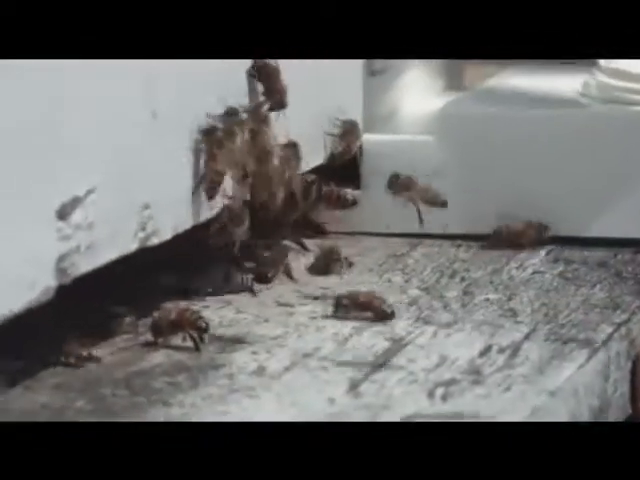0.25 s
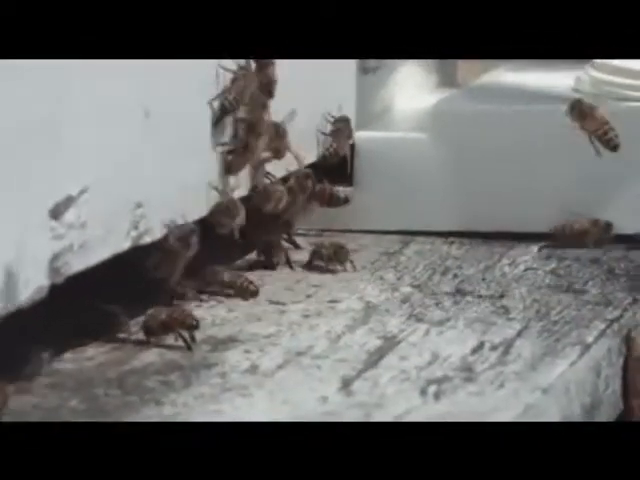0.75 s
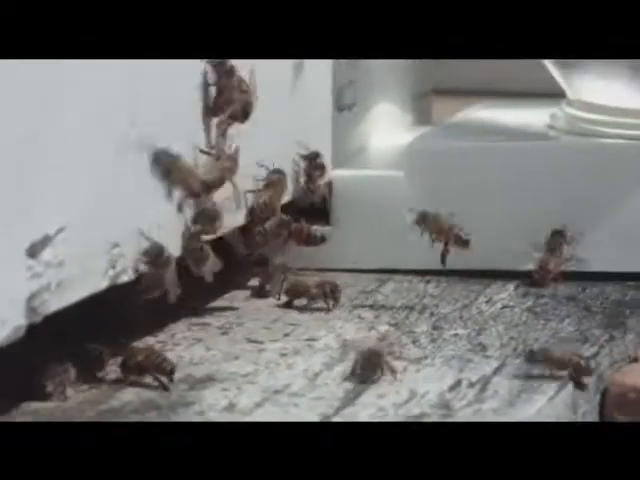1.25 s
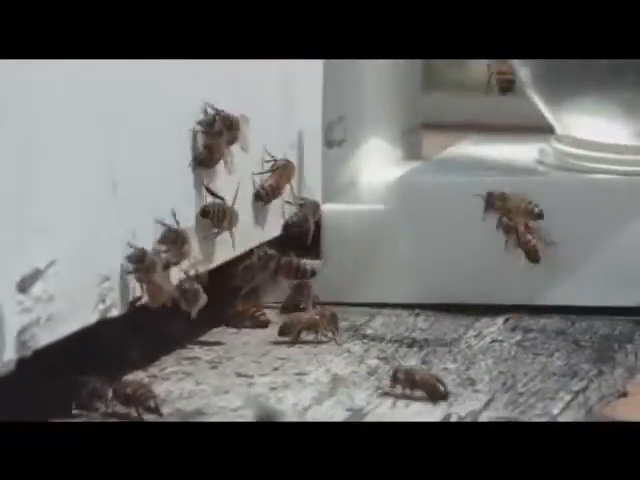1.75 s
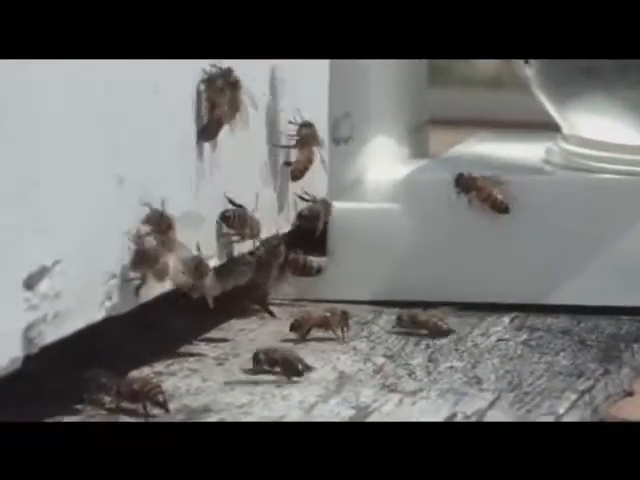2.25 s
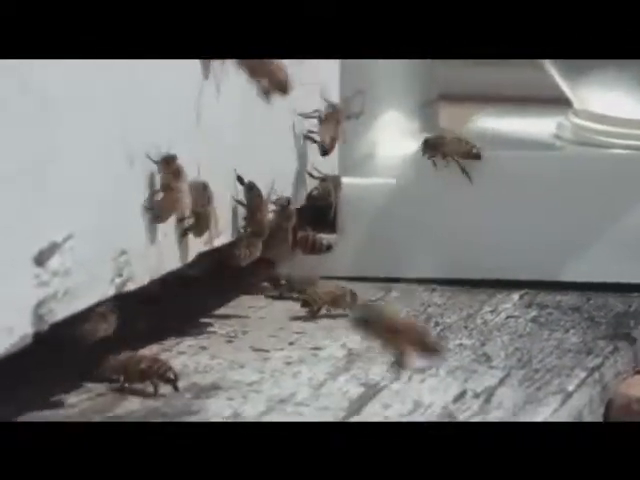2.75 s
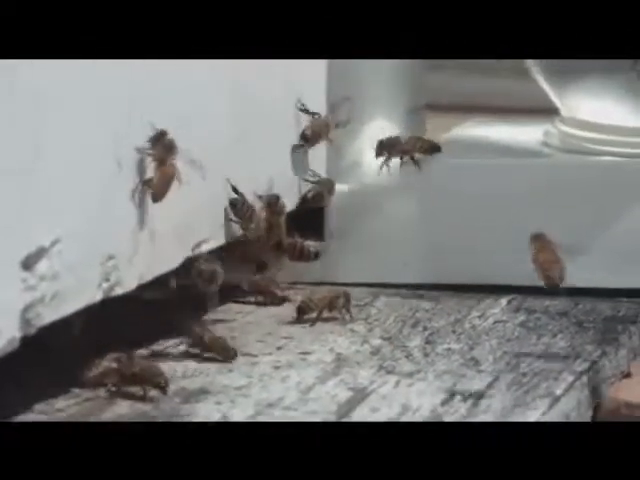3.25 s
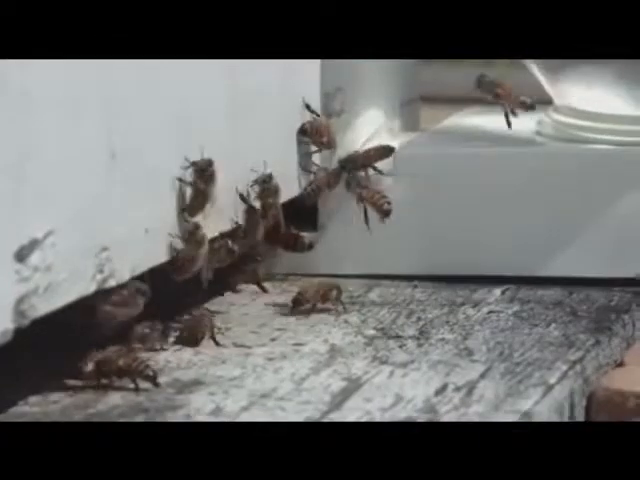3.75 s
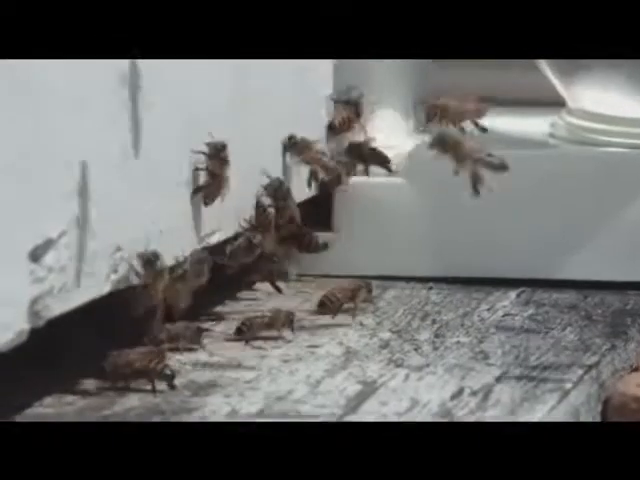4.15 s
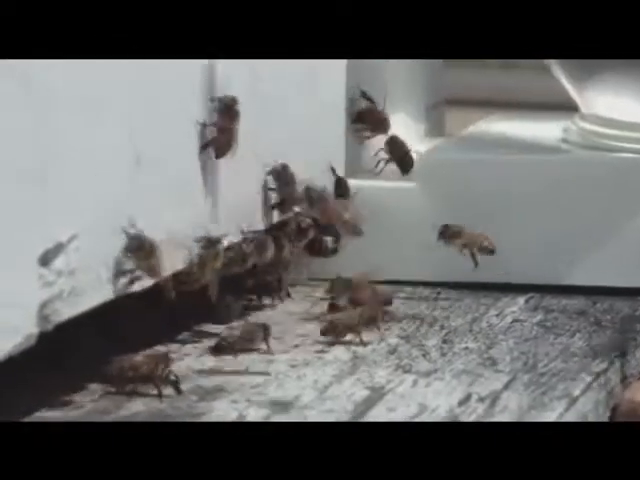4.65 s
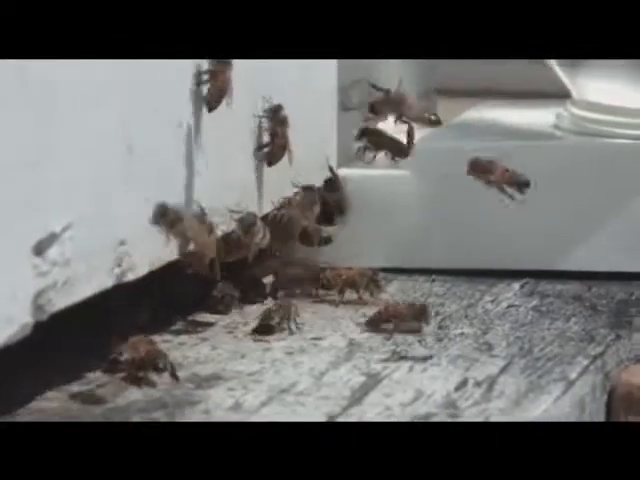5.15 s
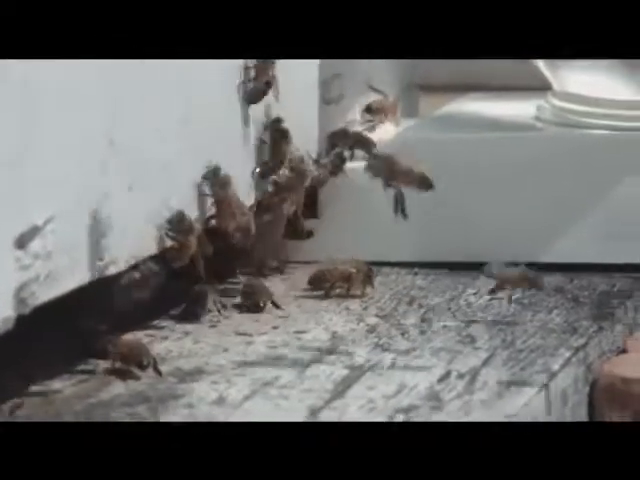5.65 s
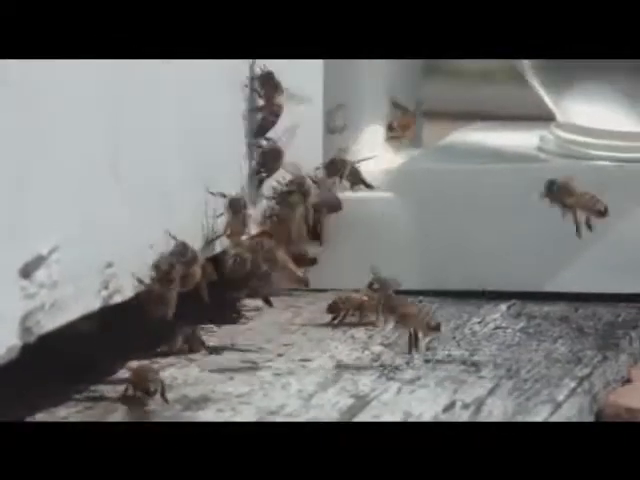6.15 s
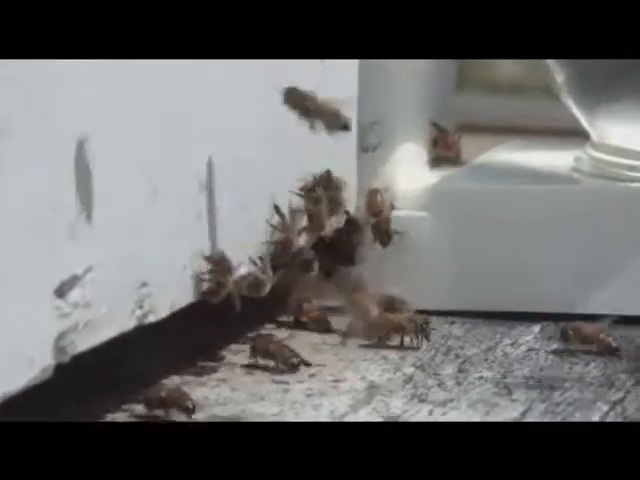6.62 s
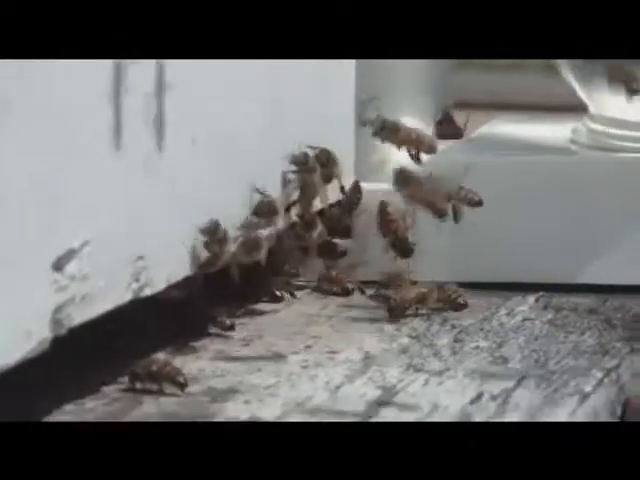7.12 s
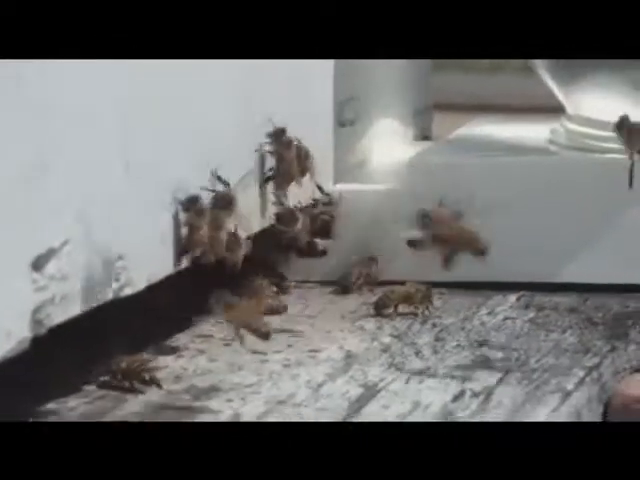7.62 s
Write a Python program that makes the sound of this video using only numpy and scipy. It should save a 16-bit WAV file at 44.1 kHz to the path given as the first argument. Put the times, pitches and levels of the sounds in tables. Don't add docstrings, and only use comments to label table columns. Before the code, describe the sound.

A windy outdoor hive entrance, heard through a small camera microphone. Deep gusts rumble and flutter throughout, with stronger slaps near 2.4, 3.1, 4.0, 6.7 and 7.5 seconds. Leaf rustle and preamp hiss make a continuous airy bed; its level steps up at 2.4, dips slightly at 4.4, leaps at 6.15, then drops at 6.7 and 7.25. Honey bees blend into a soft wavering hum around 250 hertz, swelling near 3, 4.4, 5.6 and 6.2. Individual bees pass around 1.5, 4.4, 6.3 and 7.6. Small plastic clicks occur before 0.5, the loudest at 0.45 and 0.48. Faint trilled bird whistles slide downward between 2.2 and 2.9, with sparse high notes near 3.7. A distant motor drones low, joined by a deeper one from 3.6 to 7.3. Crickets chirp softly at 0.2, 3.3 and 4.8, most clearly from 5.9 to 6.5.

```python
import sys
import numpy as np
from scipy import signal
from scipy.fft import rfft, irfft
from scipy.io import wavfile
from scipy.ndimage import uniform_filter1d

SR = 44100
rng = np.random.default_rng(int(sys.argv[2]) if len(sys.argv) > 2 else 0)


def convert_level_to_amplitude(level_db):
    exponent = np.asarray(level_db, float) / 20
    return 10 ** exponent


def store_pcm(level_fs):
    pcm = np.round(np.clip(level_fs, -1, 1) * 32767).astype(np.int16)
    wavfile.write(sys.argv[1], SR, np.atleast_2d(pcm).T)


N = 347544


def evened(x):
    return x / np.sqrt(np.mean(x ** 2) + 1e-20)


def add(mix, start_s, sound):
    part = mix[round(start_s * SR):][:len(sound)]
    part += sound[:len(part)]


def along(rows, t):
    s, *columns = np.transpose(rows)
    return [np.interp(t, s, column) for column in columns]


def wander(length, per_s):
    knots = uniform_filter1d(rng.standard_normal(600), size=5)
    return np.interp(np.arange(length) / SR * per_s * 4, np.arange(600), evened(knots))


def noise(spectrum, size, patchy_db, flicker_db):
    frames = 4 * N // size + 5
    bin_hz = np.fft.rfftfreq(size, 1 / SR)
    real, imaginary, patches = rng.standard_normal((frames, len(bin_hz), 3)).T
    patches = uniform_filter1d(patches, size=6, axis=0)
    patches = evened(uniform_filter1d(patches, size=8, axis=1))
    flicker = evened(uniform_filter1d(rng.standard_normal(frames), size=4))
    hz, db = np.transpose(spectrum)
    curve_db = np.interp(np.log(bin_hz + 1), np.log(hz + 1), db)[:, None]
    field = (real + 1j * imaginary) * convert_level_to_amplitude(curve_db + patchy_db * patches + flicker_db * flicker)
    return evened(signal.istft(field, nperseg=size, noverlap=3 * size // 4)[1][:N])


# f/Hz, level/dB per Hz
WASH_SPECTRUM = [(60, -20), (150, 0.5), (220, -16.5), (420, -12.5), (620, -19.5), (950, -14.5),
                 (1400, -21.5), (3800, -21.5)]
# f/Hz, level/dB per Hz
HISS_SPECTRUM = [(2100, -18.5), (3800, -24.5), (6000, -25.5), (8000, -20.5), (10300, -22), (12000, -28.5),
                 (15000, -33.5)]


def air():
    low, high = (signal.butter(4, 3500, kind, fs=SR, output="sos") for kind in ("low", "high"))
    wash = noise(WASH_SPECTRUM, size=1024, patchy_db=1.0, flicker_db=0.52)
    wash = evened(signal.sosfiltfilt(low, wash))
    rustle = noise(HISS_SPECTRUM, size=128, patchy_db=1.0, flicker_db=0.15)
    return convert_level_to_amplitude(-3.5) * wash + 0.88 * signal.sosfiltfilt(high, rustle)


# t/s, level/dB
HISS_LEVEL = [(0, -59.5), (.6, -60.3), (1, -59), (1.58, -58), (1.9, -60), (2.6, -60.5), (4.1, -61),
              (4.7, -59), (5.2, -60), (6.1, -60), (6.3, -62), (6.5, -60.5), (6.85, -61), (7.1, -59),
              (7.88, -59.5)]
GAIN_STEP_S = [
    2.42,
    4.425,
    5.41,
    6.148,
    6.705,
    7.255,
]
GAIN_STEP_DB = [
    2.5,
    -1.5,
    1.5,
    6,
    -3.5,
    -3,
]


def stepped_air(t):
    steps_db = sum(db * np.clip((t - s) * 200, 0, 1) for s, db in zip(GAIN_STEP_S, GAIN_STEP_DB))
    return convert_level_to_amplitude(along(HISS_LEVEL, t)[0] + steps_db + 3.5) * air()


# t/s, f/Hz, level/dB
MOTOR_TONES = [
    [(0, 108, -57.5), (1, 107.1, -54), (2.1, 104.9, -47), (3.5, 107, -53), (4.5, 107.9, -56),
     (5.3, 110.1, -56), (6.8, 110, -51), (7.88, 108, -60.5)],
    [(3.6, 77.8, -47.5), (4.2, 78.3, -45), (4.7, 78, -50), (5.7, 78.3, -49.5), (6.6, 78.5, -46.5),
     (6.9, 79, -52.5), (7.3, 78, -53)],
]


def motors():
    out = np.zeros(N)
    for rows in MOTOR_TONES:
        start_s, end_s = rows[0][0], rows[-1][0]
        hz, db = along(rows, np.arange(start_s, end_s, 1 / SR))
        turns = np.cumsum(hz * (1 + .02 * wander(len(hz), 8))) / SR
        tone = np.sin(2 * np.pi * turns) + convert_level_to_amplitude(-21) * np.sin(4 * np.pi * turns)
        add(out, start_s, np.sqrt(2) * convert_level_to_amplitude(db + 3.0 * wander(len(hz), 8.3)) * tone)
    return out


# peak t/s, reach/s, deep push level/dB, flutter level/dB
GUST_EVENTS = [(.02, 0.45, -36, -37.5), (.28, 0.044, -36.5, -42.5), (.57, 0.33, -43.5, -45),
               (.77, 0.04, -34, -55), (1.08, 0.23, -36, -42.5), (1.62, 0.18, -35, -45.5),
               (1.86, 0.15, -33.5, -39.5), (2.02, 0.052, -46, -34.5), (2.3, 0.16, -36.5, -41.5),
               (2.43, 0.1, -31, -33.5), (2.65, 0.26, -33.5, -45.5), (2.98, 0.18, -32, -45),
               (3.11, 0.068, -42, -27.5), (3.25, 0.17, -34, -39.5), (3.58, 0.064, -31, -42),
               (3.73, 0.043, -26.5, -35), (3.9, 0.26, -31.5, -38.5), (4.28, 0.17, -31.5, -37),
               (4.37, .06, -31.5, -38), (4.651, 0.03, -35, -32), (5.0, 0.38, -34.5, -45.5),
               (5.51, 0.064, -30, -39.5), (5.75, 0.11, -37, -60), (6.061, 0.013, -32.5, -32),
               (6.54, 0.083, -34.5, -42), (6.74, 0.12, -31.5, -41), (6.93, 0.025, -35, -55),
               (7.13, 0.058, -34, -46), (7.56, 0.11, -40, -47), (7.81, 0.028, -32, -60)]


def gusts(t):
    coarse = t[::64]
    s, reach, push_db, flutter_db = np.transpose(GUST_EVENTS)[:, :, None]
    reach_db, fall_share, flutter_share = -9.5, 0.71, 0.91
    away = np.maximum(s - coarse, (coarse - s) / fall_share) / reach
    push = (convert_level_to_amplitude(push_db + reach_db * away) ** 2).sum(0) + convert_level_to_amplitude(-54) ** 2
    flutter = (convert_level_to_amplitude(flutter_db + reach_db * away / flutter_share) ** 2).sum(0) + convert_level_to_amplitude(-52) ** 2
    return np.interp(t, coarse, np.sqrt(push)), np.interp(t, coarse, np.sqrt(flutter))


def steadied(x, size):
    power = uniform_filter1d(uniform_filter1d(x ** 2, size), size)
    return evened(x / power ** .17)


# f/Hz, level/dB per Hz
PUSH_SPECTRUM = [(10, -21), (22, 3.5), (35, 3.5), (60, -3.5), (90, -22.5), (200, -57), (800, -120)]
# f/Hz, level/dB per Hz
FLUTTER_SPECTRUM = [(20, -45), (40, -19.5), (70, 5), (100, -4.5), (170, -13.5), (300, -35.5), (600, -44),
                    (2000, -110)]
# t/s, peak level/dB, f/Hz, length [cycles], share of sharp overtones
EDDY_SLAPS = [(1.874, -33.5, 146, 4.1, 0.062), (2.008, -39, 149, 2.6, 0.046),
              (2.435, -27.5, 62.7, 2.1, 0.41), (3.1, -20, 81.6, 2.3, 0.28), (3.845, -50, 148, 1.8, 0.18),
              (4.023, -29, 117, 2.06, 0.18), (4.274, -33, 125, 1.5, 0.11), (4.307, -29.5, 130, 1.4, 0.11),
              (4.62, -39, 132.7, 1, 0.2), (6.681, -20.5, 98, 1.94, 0.17), (7.385, -30.5, 58.4, 5.6, 0.04),
              (7.505, -26, 41.7, 1.5, 0.053)]


def wind(t):
    push, flutter = gusts(t)
    out = push * steadied(noise(PUSH_SPECTRUM, size=4096, patchy_db=-2.0, flicker_db=2.3), size=2200)
    out += flutter * steadied(noise(FLUTTER_SPECTRUM, size=2048, patchy_db=0.5, flicker_db=2.0), size=1600)
    out *= convert_level_to_amplitude(-0.1 + 1.5 * wander(N, 13))
    puff_pass = signal.butter(3, [170, 520], "bandpass", fs=SR)
    for s, db, hz, cycles, sharp in EDDY_SLAPS:
        turns = np.arange(0, cycles, hz / SR)
        swing = np.sin(np.pi * turns / cycles)
        kinks = sum(sharp ** k * np.sin(2 * np.pi * (1 + 1.33 * k) * turns) for k in range(3))
        puff = evened(signal.lfilter(*puff_pass, rng.standard_normal(len(turns)))) * swing ** 3
        slap = convert_level_to_amplitude(db) * swing * (convert_level_to_amplitude(-23) * min(4 * sharp, 1) * puff - kinks)
        under = out[round(s * SR):][:len(turns)]
        add(out, s, slap - .85 * swing * under)
    return out


# f/Hz, level/dB, T60/s
SHELL_MODES = [
    [(1637, -4, .03), (2094, -13, .012), (2369, -4, .014), (2692, -7, .014), (3068, -1, .015),
     (3500, -9, .008), (4010, -8, .008), (5400, -12, .006)],
    [(1580, -13, .02), (2280, -7, .011), (2600, -.5, .012), (3200, -3, .011), (3700, -1.5, .014),
     (4400, -6, .009), (5100, -8, .008), (5900, -14, .006)],
]
# t/s, peak level/dB, share of the second half (0-1), strength of the crack
SHELL_TICKS = [
    (.085, -45, .3, .5),
    (.33, -47, 1, .3),
    (.3668, -36.5, 1, .7),
    (.4541, -33, .6, 1.5),
    (.4554, -26.5, .1, .9),
    (.4829, -40, .95, .9),
    (.4838, -26, .95, 1.1),
]


def ticks():
    u = np.arange(0, .04, 1 / SR)
    rise = 1 - np.exp(-u / 0.00028)
    first, second = (sum(convert_level_to_amplitude(db - 60 * u / t60) * np.sin(2 * np.pi * (hz * u + rng.random()))
                         for hz, db, t60 in modes) for modes in SHELL_MODES)
    shell_pass = signal.butter(2, [2200, 5700], "bandpass", fs=SR)
    out = np.zeros(N)
    for s, db, share, sharp in SHELL_TICKS:
        burst = rng.standard_normal(len(u)) * convert_level_to_amplitude(-60 * u / .005)
        crack = 2.2 * sharp * signal.lfilter(*shell_pass, burst)
        ring = rise * ((1 - share) * first + share * second + crack)
        add(out, s, convert_level_to_amplitude(db) * ring / abs(ring).max())
    return out


def whistle(length, from_hz, to_hz, db, trill_hz, swell_db=0., bend=0.84):
    u = np.arange(0, length, 1 / SR)
    trill = np.sin(2 * np.pi * 95 * u) + 0.35 * wander(len(u), 62.6)
    hz = from_hz + (to_hz - from_hz) * (u / length) ** bend + trill_hz * trill
    tone = np.sqrt(2) * np.sin(2 * np.pi * np.cumsum(hz) / SR)
    level = convert_level_to_amplitude(db + swell_db * (u / length - 1) + 1.3 * wander(len(u), 70))
    return level * tone * signal.windows.tukey(len(u), .2)


# t/s, length/s, start f/Hz, end f/Hz, end level/dB
PHRASE_SLIDES = [
    (2.214, .066, 3170, 2480, -59),
    (2.445, .11, 3420, 2540, -55.5),
    (2.73, .107, 3400, 2480, -55.5),
]
# t/s, start f/Hz, fall in f/Hz, level/dB
PHRASE_FLICKS = [
    (2.29, 2720, 250, -60),
    (2.324, 2200, -180, -67),
    (2.557, 2830, 520, -57),
    (2.589, 2700, 300, -59),
    (2.615, 2620, 100, -66),
    (2.835, 2400, 420, -62),
    (2.853, 2450, 280, -61),
    (2.88, 2280, 200, -63),
    (4.24, 2750, -250, -68),
]
# t/s, length/s, start f/Hz, end f/Hz, level/dB
FAR_NOTES = [(3.04, .035, 3350, 2900, -72), (4.185, .045, 2420, 2680, -66), (3.54, .035, 7750, 7950, -67),
             (3.6, .07, 7350, 8200, -69), (3.7, .075, 7700, 7950, -65), (3.742, .025, 7000, 7900, -61),
             (3.797, .015, 7750, 7900, -66), (4.015, .033, 7100, 7950, -66), (5.4, .22, 1745, 1735, -75),
             (5.785, .055, 1825, 1815, -68), (6.14, .155, 1895, 1810, -67)]


def birds():
    out = np.zeros(N)
    for s, length, from_hz, to_hz, db in PHRASE_SLIDES:
        add(out, s, whistle(length, from_hz, to_hz, db, trill_hz=150, swell_db=7, bend=.76))
    for s, hz, fall_hz, db in PHRASE_FLICKS:
        add(out, s, whistle(.018, hz, hz - fall_hz, db, trill_hz=20))
    for s, length, from_hz, to_hz, db in FAR_NOTES:
        add(out, s, whistle(length, from_hz, to_hz, db, trill_hz=85))
    u = np.arange(3000) / SR
    echoes = rng.standard_normal(3000) * (rng.random(3000) < .03) * convert_level_to_amplitude(-60 * u / 0.14)
    return out + convert_level_to_amplitude(-12) * signal.oaconvolve(out, echoes / np.linalg.norm(echoes))[:N]


# t/s, strokes, stroke period/s, level/dB, f/Hz
CRICKET_TRILLS = [
    (.1999, 2, .0305, -52, 2950),
    (3.245, 3, .0505, -56, 2820),
    (3.3967, 4, .0542, -51, 2850),
    (4.797, 4, .0545, -60, 2960),
    (5.8935, 3, .0555, -54, 2820),
    (6.0813, 2, .047, -51, 2820),
    (6.1734, 3, .0484, -44, 2870),
    (6.3225, 3, .0559, -44.5, 2970),
    (6.4704, 1, .05, -50, 3050),
]
# t/s, level/dB
FAR_CRICKETS = [(0, -72), (2, -75.5), (3.6, -74.5), (4, -77), (5, -73.5), (5.5, -74), (6, -70), (6.5, -79),
                (7, -68.5), (7.5, -69), (7.88, -80)]


def crickets(t):
    u = np.arange(0, .02, 1 / SR)
    shape = np.exp(-((u - .002) / .0014) ** 2) + .25 * np.exp(-u / .005) * (u > .002)
    out = np.zeros(N)
    for s, strokes, every, db, hz in CRICKET_TRILLS:
        chance = rng.standard_normal((8, 2))
        for k, (loud, sharp) in enumerate(chance[:round(strokes)]):
            tone = np.sin(2 * np.pi * (hz + 25 * sharp) * u)
            add(out, s + k * every, convert_level_to_amplitude(db - 3.5 + 1.1 * loud) * shape * tone)
    throb = 1 + 0.37 * np.cos(2 * np.pi * np.cumsum(19 + 1.425 * wander(N, 0.55)) / SR)
    band = noise([(2300, -40), (2600, -6), (2870, -.1), (3100, -6), (3400, -40), (5000, -90)],
                 size=512, patchy_db=1.2, flicker_db=1.2)
    return out + convert_level_to_amplitude(along(FAR_CRICKETS, t)[0]) * throb * band


# multiple of the wingbeat, level/dB
WING_HARMONICS = [(1, -2), (2, 0.5), (3, -11), (4, -15.5), (5, -8.5), (6, -10), (7, -13), (8, -35)]


def wingbeat(hz):
    turn = np.arange(1024) / 1024
    stroke = sum(convert_level_to_amplitude(db) * np.cos(2 * np.pi * (round(k) * turn + rng.random())) for k, db in WING_HARMONICS)
    phase = np.cumsum(hz) / SR % 1
    return evened(stroke)[(phase * 1024).astype(int)]


# t/s, length/s, wingbeat f/Hz, glide in f/Hz, closest level/dB
PASSING_BEES = [
    (1.3, 0.57, 235.5, 2, -70),
    (1.35, 0.73, 255, 4, -63.5),
    (4.25, 0.46, 196.9, -4, -59.5),
    (6.104, 0.605, 271.2, -14.5, -64),
    (6.352, .36, 224, -6.5, -62),
    (7.403, 0.53, 255.7, -2.5, -63.5),
]


def flyers():
    out = np.zeros(N)
    nearest = 0.33
    for s, length, hz, glide_hz, db in PASSING_BEES:
        u = np.arange(0, 1, 1 / (length * SR))
        beat = wingbeat((hz + glide_hz * u) * (1 + 0.00556 * wander(len(u), 11.2)))
        distance = np.maximum(1 - u / nearest, (u - nearest) / (1 - nearest))
        level = convert_level_to_amplitude(db - 21.5 * distance ** 2 + 2.1 * wander(len(u), 12.6))
        add(out, s, level * beat * signal.windows.tukey(len(u), .3))
    return out


# t/s, level/dB
SWARM_LEVEL = [(0, -69.5), (.5, -65), (.7, -63), (1.17, -66), (1.42, -62), (1.75, -64.5), (2.4, -64),
               (2.75, -59), (3.12, -59.5), (3.5, -63), (4.3, -59.5), (4.78, -63), (4.95, -68),
               (5.62, -59.5), (6.1, -66.5), (6.18, -56.5), (7.2, -61), (7.88, -66)]


def swarm(t):
    hum = np.zeros(N)
    for place in np.linspace(-1, 1, 22):
        centre_hz = 251 + 14 * place + 7 * place ** 3
        hz = centre_hz * (1 + .014 * wander(N, 2.5) + .005 * wander(N, 15))
        hum += convert_level_to_amplitude(4 * wander(N, 6)) * wingbeat(hz)
    return convert_level_to_amplitude(along(SWARM_LEVEL, t)[0] + 1.5) * evened(hum)


def scene():
    t = np.arange(N) / SR
    background = stepped_air(t) + motors() + wind(t) + ticks()
    return (background + birds() + crickets(t) + flyers() + swarm(t))[None]


def band_limit(x):
    return signal.sosfilt(signal.butter(12, 15030, fs=SR, output="sos"), x)


# start t/s, end t/s
TOP_BAND_GAPS = [(.36, .5), (.82, .9), (1.05, 1.1), (1.3, 1.45), (1.52, 1.57), (5.3, 5.33), (5.41, 5.44),
                 (5.99, 6.09), (6.19, 6.3), (6.39, 6.48), (6.95, 6.99), (7.11, 7.28), (7.37, 7.41),
                 (7.58, 7.88)]


def record(dry):
    above_top = np.fft.rfftfreq(N, 1 / SR) > 14620
    top = irfft(rfft(dry) * above_top, N)
    t = np.arange(N) / SR
    gone = uniform_filter1d(sum((t > a) * (t < b) * 1. for a, b in TOP_BAND_GAPS), size=400)
    return band_limit(dry - gone * top - .0014)


dry = scene()
out = record(dry)
store_pcm(out)
```